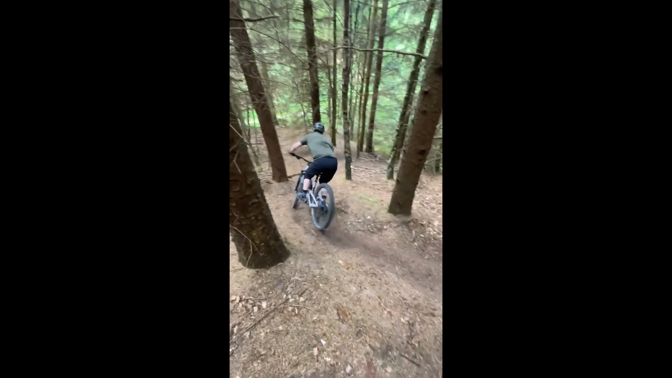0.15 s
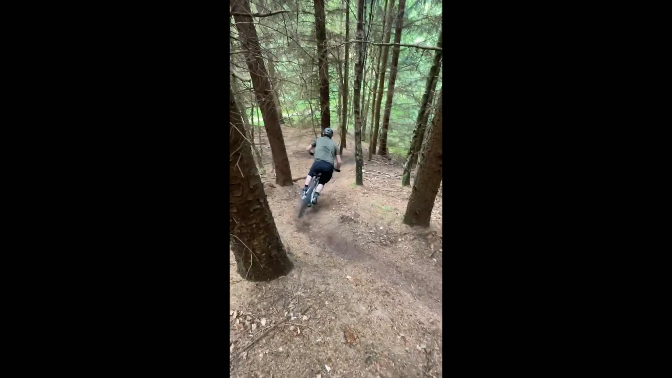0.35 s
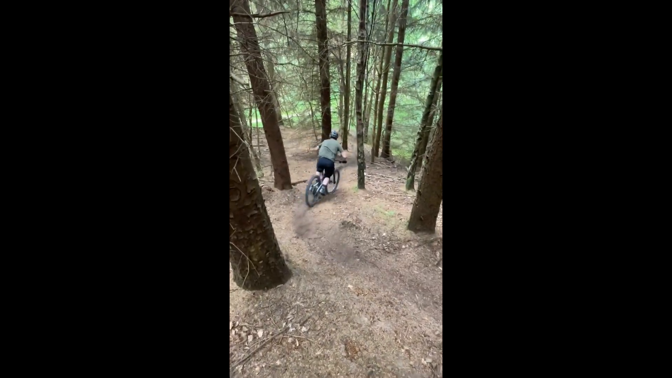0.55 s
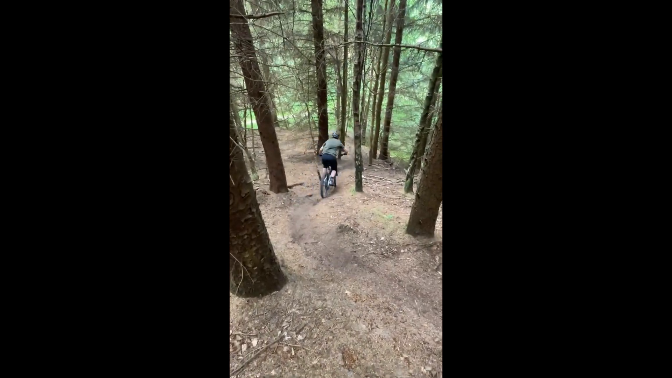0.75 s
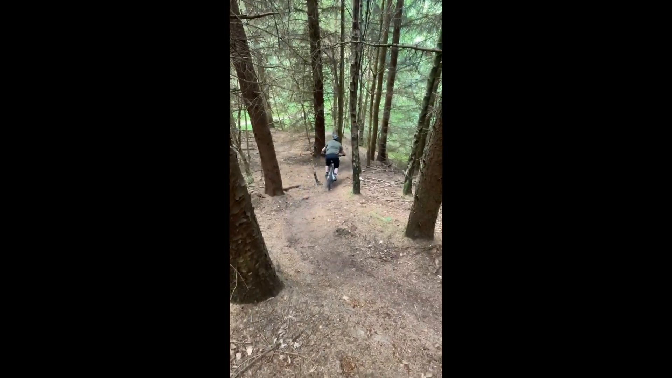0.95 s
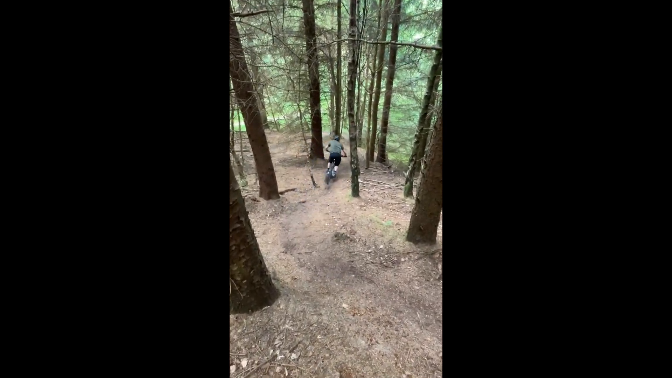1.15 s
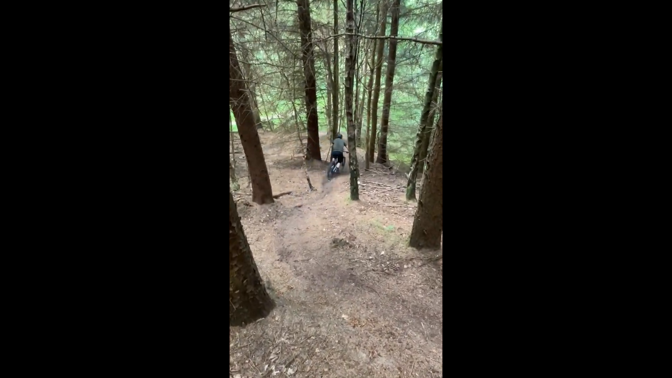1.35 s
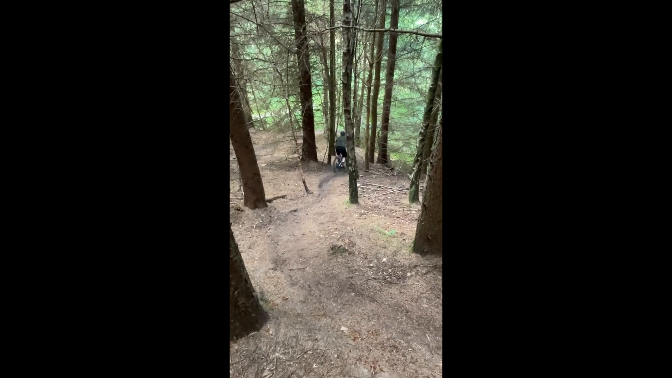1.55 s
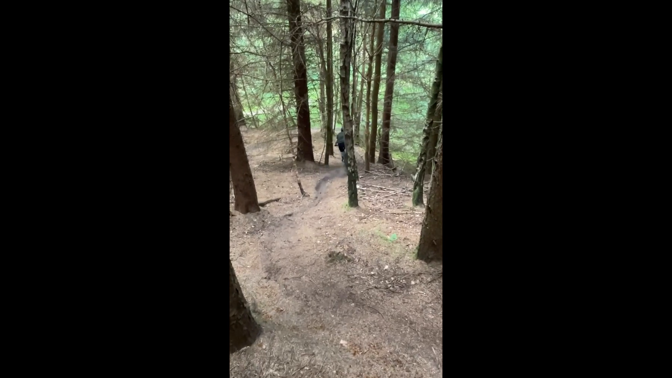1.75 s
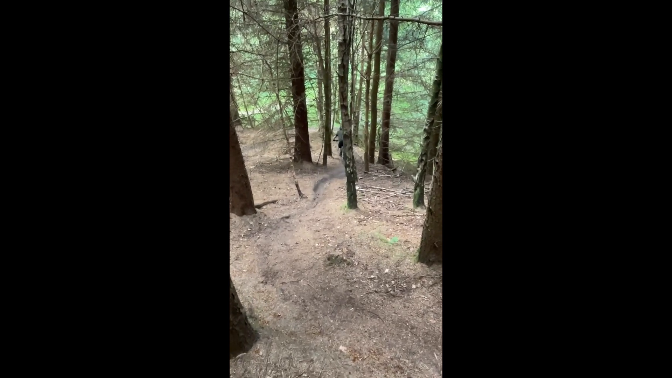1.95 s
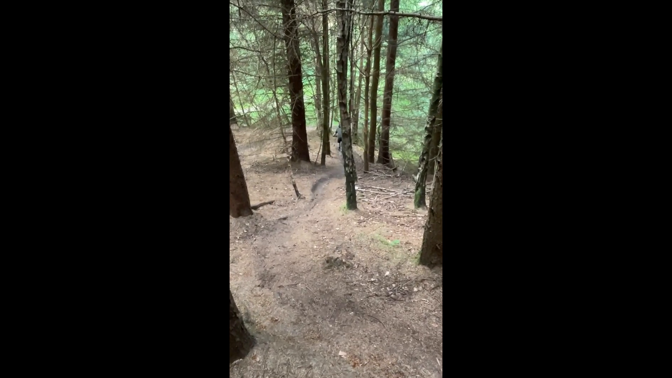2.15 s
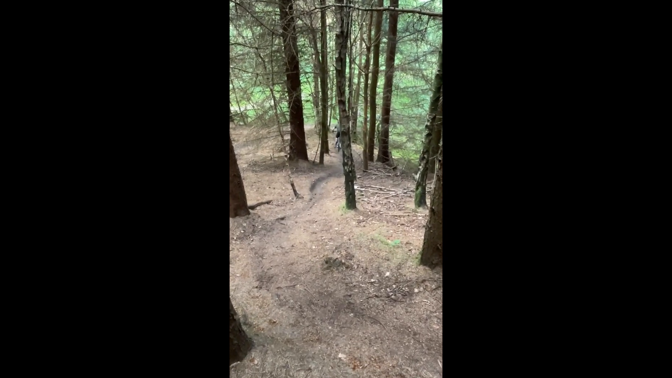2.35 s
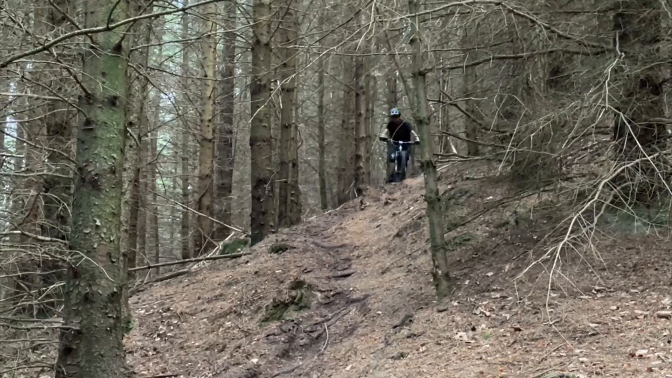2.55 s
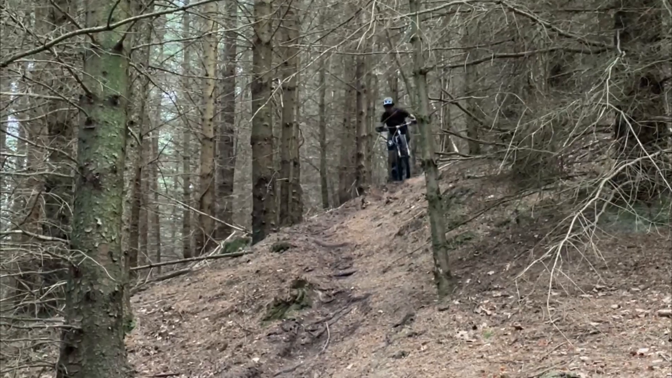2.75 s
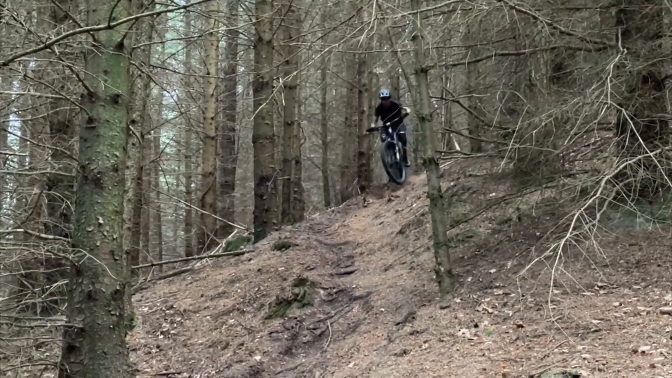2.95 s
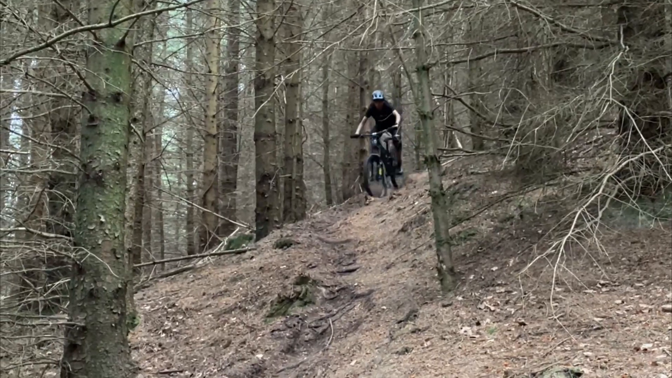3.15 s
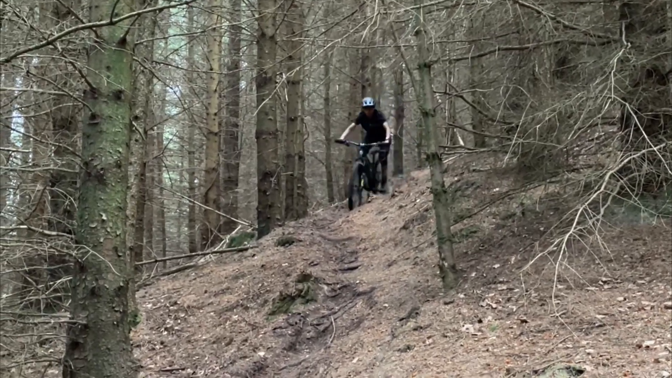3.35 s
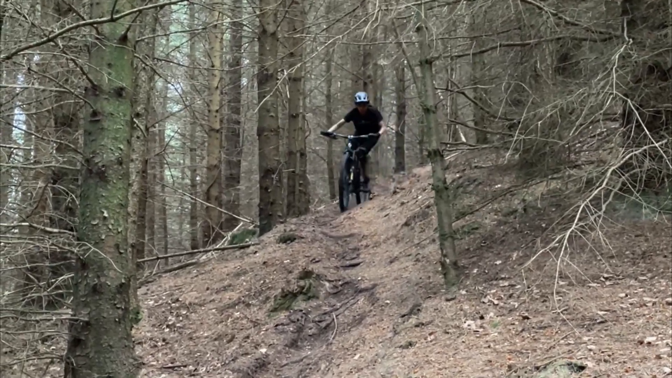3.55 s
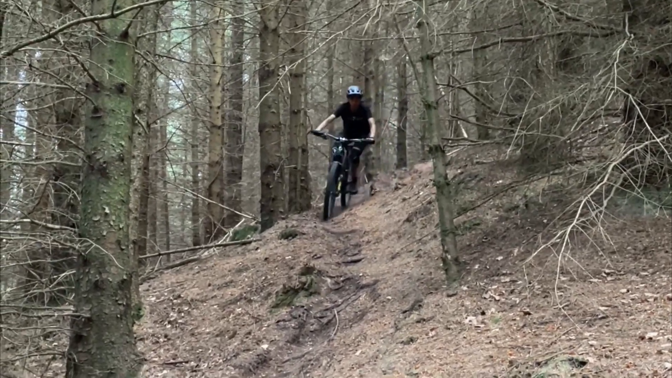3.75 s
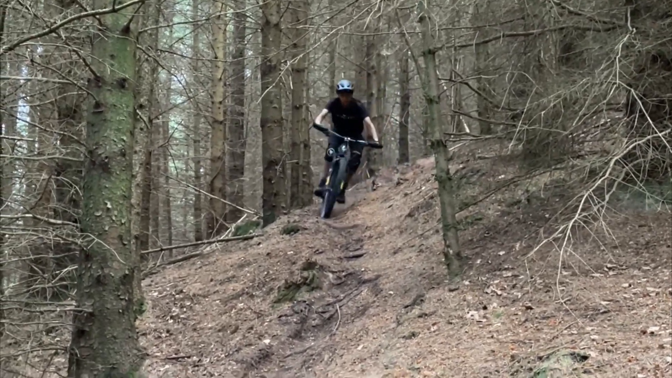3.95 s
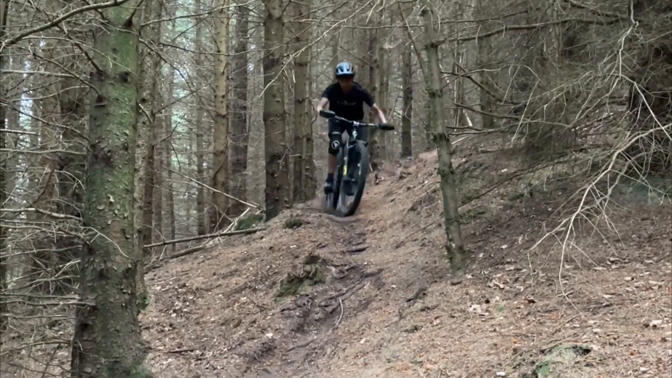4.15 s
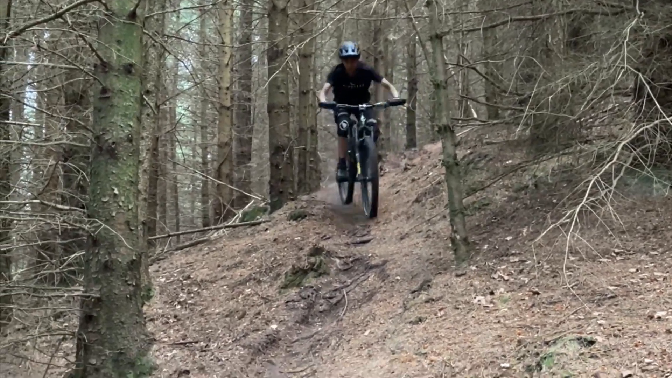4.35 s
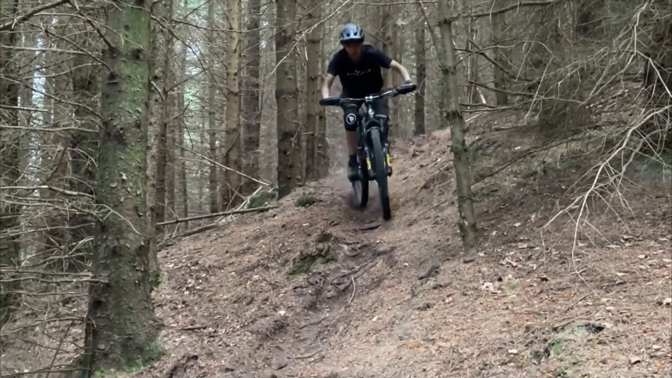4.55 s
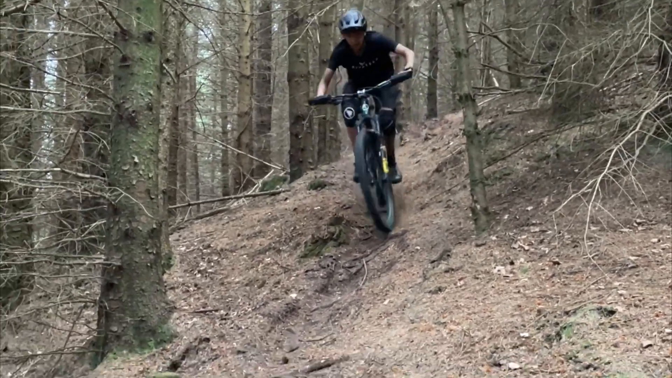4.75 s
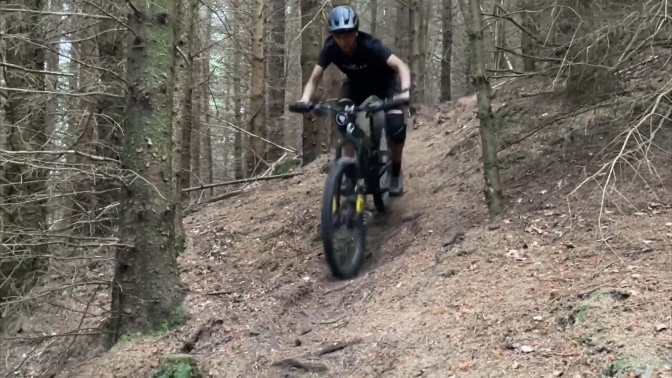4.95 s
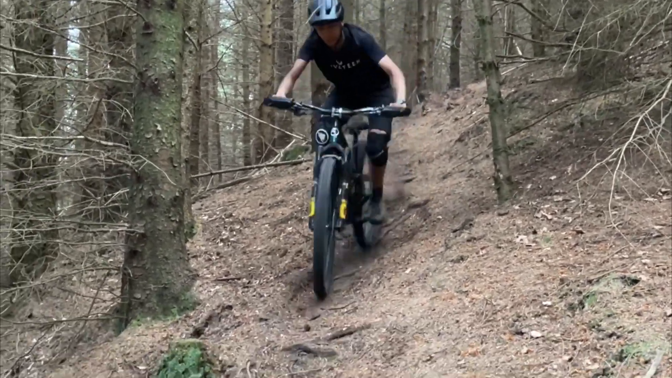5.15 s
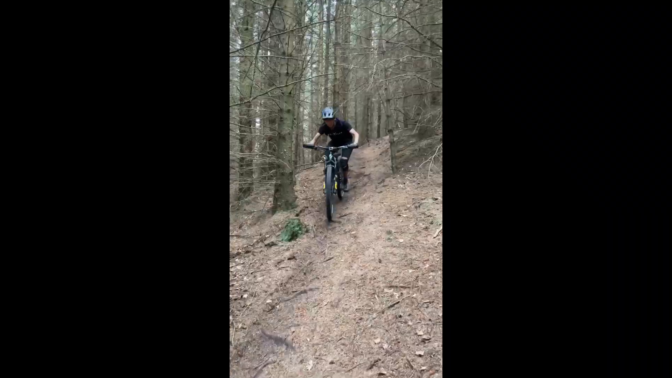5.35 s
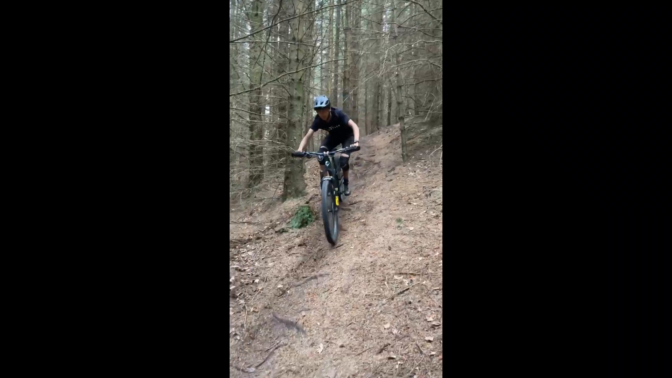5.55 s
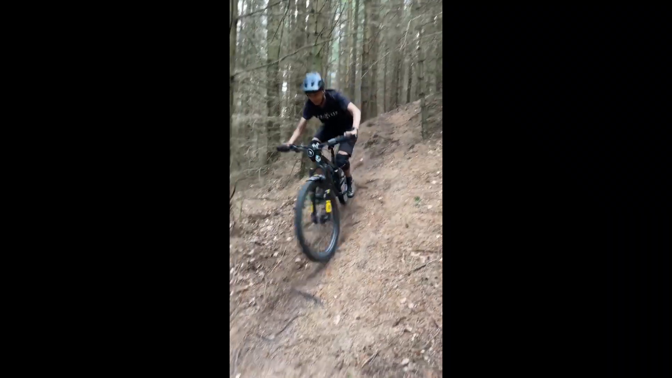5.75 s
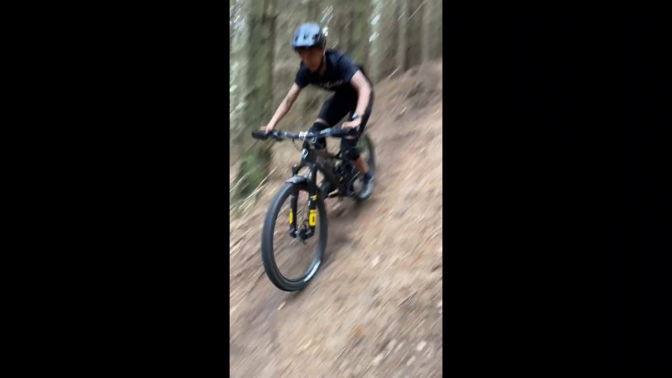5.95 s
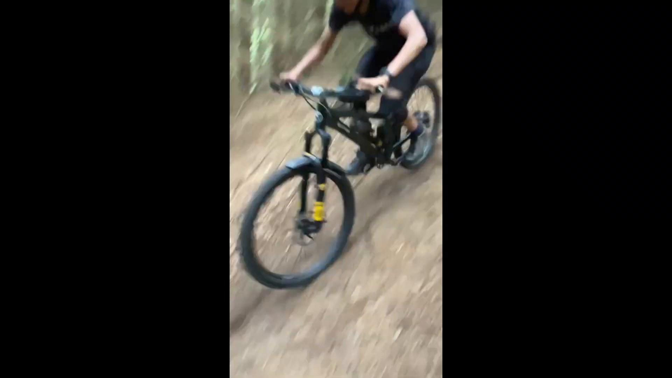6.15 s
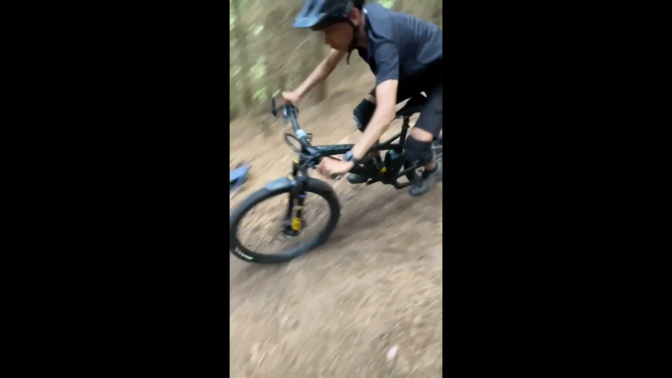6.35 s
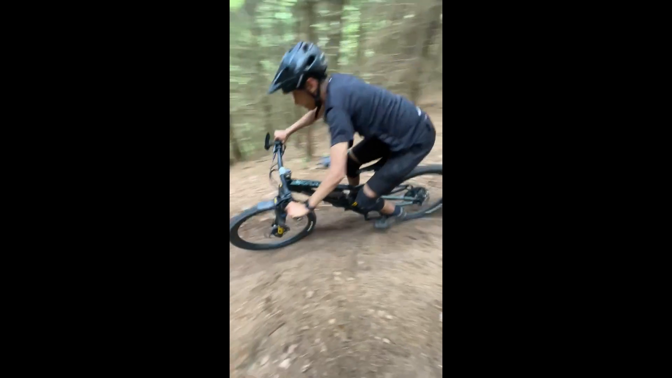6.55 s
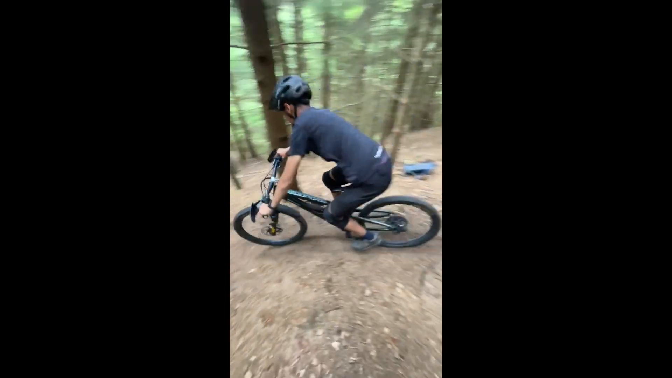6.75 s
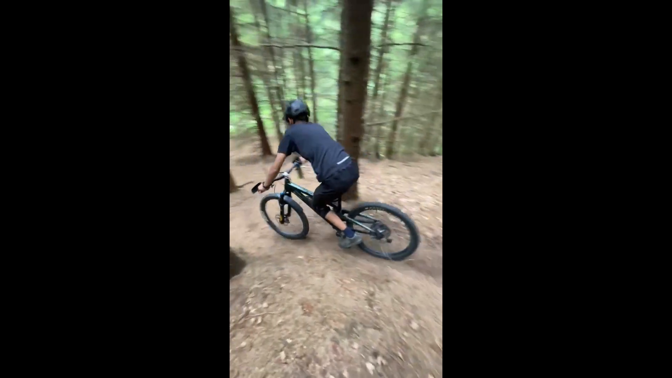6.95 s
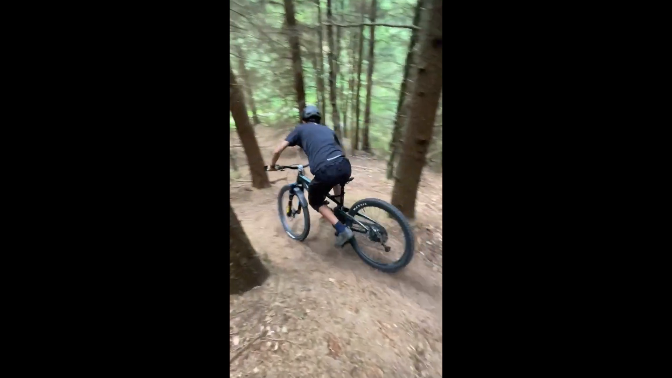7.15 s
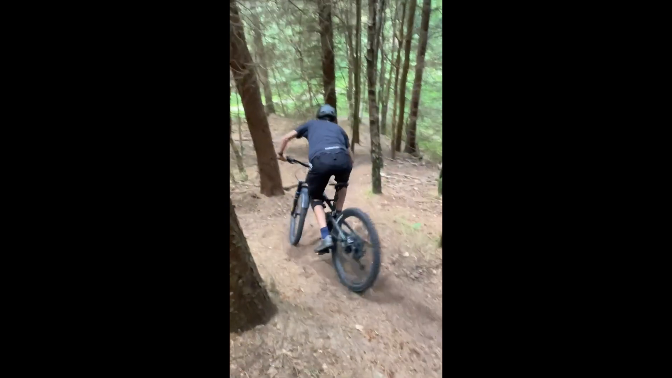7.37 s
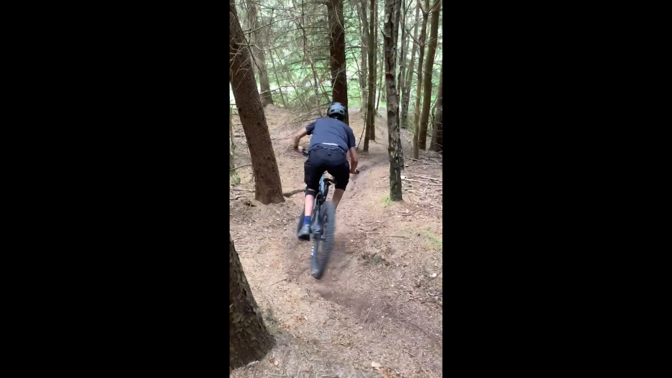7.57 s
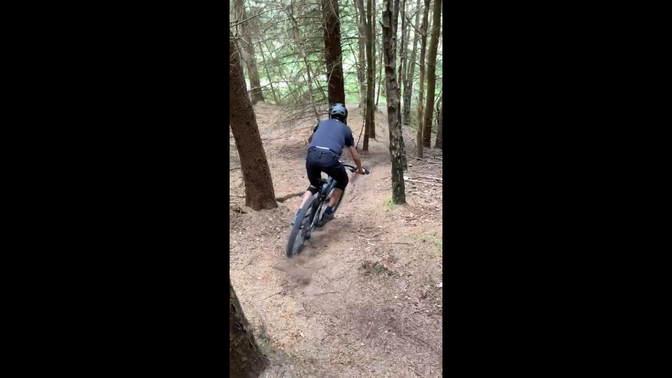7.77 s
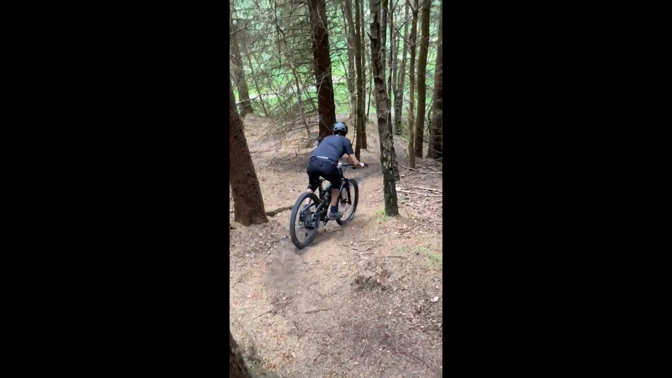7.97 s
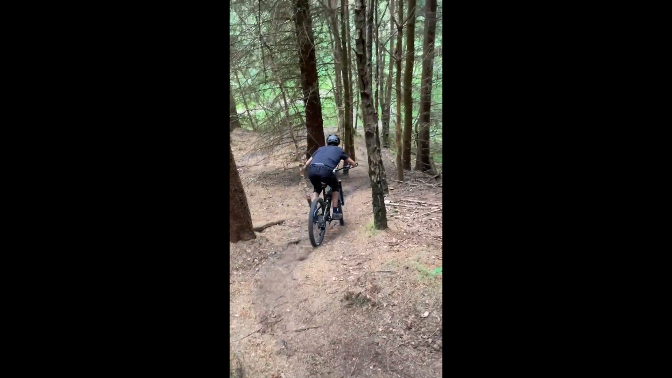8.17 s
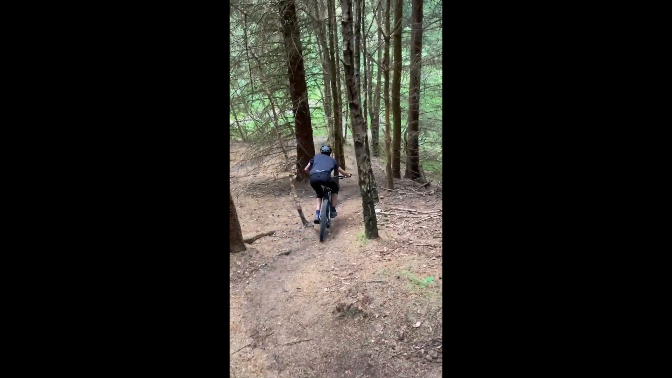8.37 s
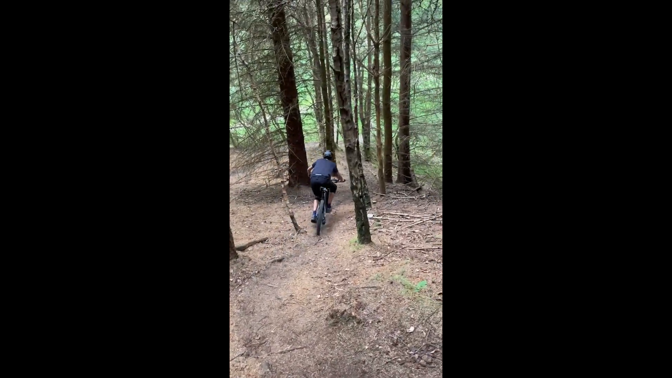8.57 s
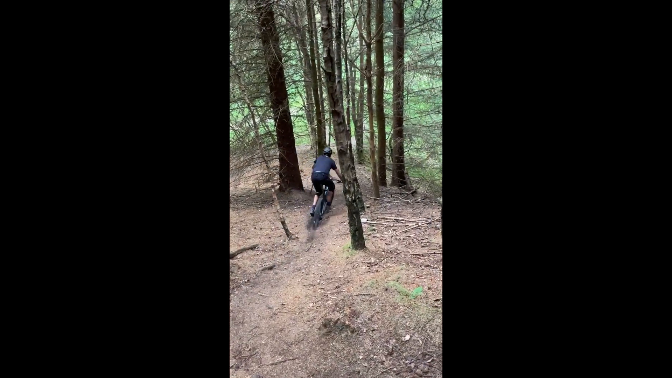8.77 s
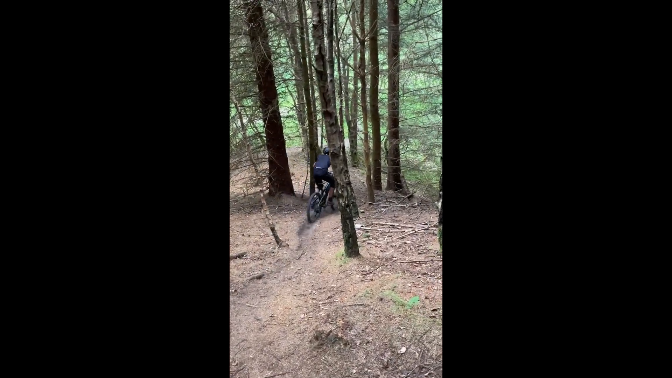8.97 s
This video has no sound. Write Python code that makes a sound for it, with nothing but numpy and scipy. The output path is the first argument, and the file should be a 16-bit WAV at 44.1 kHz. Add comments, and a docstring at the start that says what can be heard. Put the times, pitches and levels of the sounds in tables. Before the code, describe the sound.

Beside a dry forest trail, a bike is already close at 0 seconds: knobbly tyres crunch loose dirt, knock over roots and thump softly, leaning left, with a dull freehub buzz. It recedes through 1 to 2 seconds, leaving sparse crackles, twig ticks, faint bird chatter and a thin high squeak near 2.2. A momentary dip at 2.4 joins a quieter stretch of faint hush, wavering bird whistles and a distant ticking hub. From about 3.9 the second bike's tyres become audible; bumps and crunch grow after 5. It passes very close around 6.2 to 7.1, with hard knocks, low thuds, brittle snaps at 6.4, 6.75 and 7.1, and a bright, fast ratchet. Chain slaps scratch at 7.3, a short brake squeak follows near 7.7, and a snap lands at 7.9. Crunch and buzzing then thin with distance, still rolling at 9 seconds.

```python
"""Mountain bikes on a dry forest trail

One bike freewheels away; after a brief dip in level another comes closer and passes. Knobbly tyres crunch in
filtered random grains and thud over roots as decaying sines, and a pulsed-noise freehub ratchet buzzes.
Twigs snap as ringing ticks, birds whistle in gliding sines and chatter in pulsed hiss, chain and brake join in."""
import sys
import numpy as np
from scipy import signal
from scipy.fft import rfft, irfft
from scipy.io import wavfile
from scipy.ndimage import uniform_filter1d

SR = 44100
rng = np.random.default_rng(int(sys.argv[2]) if len(sys.argv) > 2 else 0)


def transcribe(signal):
    """Save signal, clipped to [-1, 1], as a 16-bit WAV file at the path in sys.argv[1]."""
    frames = np.atleast_2d(signal).T
    limited = np.clip(frames, -1, 1)
    pcm = np.round(limited * 32767).astype(np.int16)
    wavfile.write(sys.argv[1], SR, pcm)


N = 397320
T = np.arange(N) / SR
JOIN_S = 2.402  # the first ride gives way to the second
# Tyre meets root or stone. Each row: time in seconds, blow level before filtering in dB, ring in Hz,
# contact in seconds, drive of the tyre air relative to the blow in dB.
BLOWS = [(0.048, -22, 746, 0.054, -13), (0.088, -23, 1750, 0.055, -25), (0.206, -21, 1000, 0.052, -30),
         (0.249, -22.5, 745, 0.048, -17), (0.331, -26.5, 597, 0.047, -3.5), (0.37, -27, 390, 0.034, -22),
         (0.644, -33.5, 403, 0.027, 4), (0.867, -36, 445, 0.054, -2), (0.909, -35.5, 770, 0.079, -3),
         (1.093, -33, 400, 0.05, -9), (1.124, -31, 1770, 0.17, -20), (1.183, -19.5, 740, 0.029, -2.5),
         (1.235, -28.5, 950, 0.076, -13), (1.439, -38, 890, 0.086, -38), (1.661, -36, 785, 0.082, -0.5),
         (2.296, -34, 740, 0.055, -7), (3.228, -51.5, 2020, 0.14, -26), (3.885, -30, 492, 0.041, -12),
         (3.918, -35.5, 588, 0.1, -26), (4.438, -41, 1360, 0.058, -4.5), (4.528, -38.5, 726, 0.069, -33),
         (4.61, -32, 650, 0.043, -11), (4.764, -33.5, 500, 0.056, -3.5), (4.86, -31, 684, 0.036, -7),
         (4.982, -32.5, 611, 0.026, 0.5), (5.093, -30.5, 690, 0.029, 1), (5.135, -35.5, 617, 0.046, -2),
         (5.181, -30, 812, 0.029, -30), (5.204, -30, 1480, 0.033, -5), (5.31, -42, 2100, 0.044, -32),
         (5.427, -25.5, 556, 0.029, -7), (5.499, -35, 885, 0.037, -0.5), (5.577, -21, 825, 0.035, -2.5),
         (5.819, -15.5, 1050, 0.035, -3), (5.895, -24.5, 634, 0.055, -3), (5.932, -20.5, 718, 0.048, -11),
         (6.081, -14, 560, 0.03, -2), (6.201, -27, 590, 0.028, 4.5), (6.237, -26, 433, 0.068, -7),
         (6.287, -18.5, 1102, 0.04, -20), (6.314, -15, 1620, 0.069, -16), (6.36, -23, 470, 0.025, 3.5),
         (6.398, -33, 1603, 0.03, -38), (6.449, -9, 2420, 0.054, -12), (6.487, -13, 404, 0.051, -6.5),
         (6.742, -13, 660, 0.045, -5.5), (6.899, -24, 461, 0.037, -7), (7.053, -23.5, 417, 0.056, -6),
         (7.1, -24, 1743, 0.074, -6), (7.196, -26, 880, 0.024, -18), (7.37, -23, 531.5, 0.061, -7.5),
         (7.411, -23, 474, 0.036, -16), (7.613, -26.5, 452, 0.024, -34), (7.696, -17, 1210, 0.048, -15.5),
         (7.732, -30.5, 480.4, 0.047, -11), (7.832, -27, 1224, 0.021, -33), (7.927, -21, 622, 0.041, -5),
         (8.04, -29, 1094, 0.037, -5), (8.6, -31, 473, 0.029, -12), (8.78, -34.5, 916, 0.072, -30)]


def undb(db):
    """Amplitude ratio of a level in decibels."""
    return 10 ** (np.asarray(db) / 20)


def unit(x):
    """Normalise to a root mean square of 1."""
    return x / np.sqrt(np.mean(x ** 2))


def track(table):
    """Linear interpolation: the columns of a curve table at every sample."""
    s, *columns = np.transpose(table)
    return [np.interp(T, s, c) for c in columns]


def over_spectrum(points):
    """Amplitude ratio at each FFT bin, from (Hz, dB) points joined along log frequency."""
    hz, db = np.transpose(points)
    f = np.arange(N // 2 + 1) * SR / N + 1
    return undb(np.interp(np.log(f), np.log(hz), db))


def colour(x, points):
    """Spectral shaping: weight each frequency by (Hz, dB) points."""
    return irfft(rfft(x) * over_spectrum(points), N)


def band(x, hz, width):
    """Second-order resonance with a gain of 1 at its peak."""
    return signal.lfilter(*signal.iirpeak(hz, hz / width, fs=SR), x)


def walk(rate):
    """Slow random modulation: levels held for 1 / rate seconds and smoothed twice."""
    k = int(SR / rate)
    steps = np.repeat(rng.standard_normal(N // k + 1), k)
    return uniform_filter1d(uniform_filter1d(steps, k), k)[:N]


def grains(per_s, spread_db):
    """Granular noise: clicks at random times, a few far larger than the rest."""
    hit = rng.random(N) < per_s / SR
    return unit(hit * rng.standard_normal(N) * undb(spread_db * rng.exponential(size=N)))


def bursts(times, gains, lengths, peak_at):
    """Contact force envelopes that build up, peak at a share of their length and let go."""
    env = np.zeros(N)
    for s, g, length in zip(times, gains, lengths):
        i = int((s - .003) * SR)
        u = np.linspace(0, 1, int(SR * length))[:N - i]
        warped = u ** (np.log(.5) / np.log(peak_at))
        env[i:i + len(u)] += g * np.sin(np.pi * warped) ** 2
    return env


def catches():
    """Chain tension hushes the ratchet by this many dB: a gradual onset, then a release within 12 ms."""
    # The swinging rear end pulls the chain tight. Each row: time free again in seconds, length in seconds, hush in dB.
    pulls = [(1.097, 0.049, 10), (4.445, .07, 7), (4.611, 0.059, 5), (4.862, 0.096, 9), (5.108, 0.081, 5),
             (5.578, 0.08, 12), (5.813, .15, 10), (5.953, 0.043, 5), (6.09, .07, 8), (6.962, 0.06, 10),
             (7.11, 0.092, 6), (7.225, 0.076, 6), (7.368, .05, 5), (7.599, 0.048, 8), (7.938, 0.052, 8),
             (8.063, 0.044, 8), (8.796, .06, 9)]
    onset_share, free_s = .85, .012
    hush_db = 0
    for s, length, db in pulls:
        corners = [s - length, s - length * (1 - onset_share), s - free_s, s]
        hush_db = hush_db + np.interp(T, corners, [0, db, db, 0])
    return hush_db


def crunch(roll_db):
    """Granular fracture: clods and needles break under the knobs, and blows ring rim and frame modes."""
    # Dirt spectrum. Each row: frequency in Hz, density in dB.
    dirt_spectrum = [(250, 1), (420, 4), (750, 3.5), (1100, 2), (1900, 0.5), (2600, -5.5), (3300, -12.5),
                     (6000, -38)]
    # Rim and frame modes. Each row: frequency in Hz, width in Hz, mean gain in dB before the mix.
    frame_modes = [(825, 34, -5), (1250, 28, -13), (1860, 64, -20), (2060, 66, -3), (2620, 60, -21)]
    ring_width = .13  # share of the ring pitch
    ring_room = 900  # samples for a ring to die out after the contact
    rolling = undb(roll_db + 2.2 * walk(30) + 2.5 * walk(70)) * grains(3000, spread_db=1.6)
    s, db, hz, contact, _ = np.transpose(BLOWS)
    clods = grains(2600, spread_db=1.6)
    blows = bursts(s, undb(db), contact, peak_at=0.24) * clods

    rings = np.zeros(N)
    for t, f, length in zip(s, hz, contact):
        span = slice(int((t - .003) * SR), int((t + length) * SR))
        blow = np.r_[blows[span], np.zeros(ring_room)]
        rings[span.start:span.stop + ring_room] += band(blow, f, ring_width * f) / (f / 1000) ** 0.63
    # each frame mode is caught by turns as the wheel bucks
    frame = sum(undb(g + 6 * walk(48)) * band(blows + rolling, f, w) for f, w, g in frame_modes)
    # rubber and soil swallow the top of the rings
    lowpass = signal.butter(4, 3300, fs=SR, output="sos")
    body = signal.sosfilt(lowpass, undb(3.5) * rings + undb(-2.5) * frame)

    # bright grit: -60.5 dB for a -30 dB blow at 1 kHz, rising with the blow and 6 dB per octave of ring
    grit_db = -60.5 + 1.1932 * (db + 30) + 6 * np.log2(hz / 1000)
    grit_noise = unit(band(grains(2100, spread_db=2.0), 3300, 3600))
    grit = bursts(s, undb(grit_db), .5 * contact, peak_at=0.12) * grit_noise
    scale = np.std(colour(clods, dirt_spectrum))
    return colour(rolling + undb(-8.0) * blows, dirt_spectrum) / scale + body + grit


def tyre_air(roll_db):
    """Cavity resonance: the air ring inside the tyre hums while rolling and booms just after a blow."""
    # Air ring modes. Each row: frequency in Hz, width in Hz, gain in dB.
    air_modes = [(209.3, 71.4, 16), (243.3, 68, 12.5)]
    s, db, _, contact, air_db = np.transpose(BLOWS)
    booms = bursts(s, undb(db + air_db), contact, peak_at=0.48)
    env = undb(roll_db + 0.15 * walk(18.0)) + undb(-1.5) * booms
    push = env * grains(1200, spread_db=2.0)
    return sum(undb(g) * band(push, hz, w) for hz, w, g in air_modes)


def ground(rumble_db):
    """Damped soil resonance: small jolts rumble, and each landing rings low and sinks in pitch."""
    # Weight lands on the soil. Each row: time in seconds, initial level in dB.
    landings = [(0.198, -25), (0.313, -23), (0.652, -31), (0.872, -41), (1.102, -34), (1.589, -40),
                (1.76, -40), (4.141, -37.5), (4.444, -34), (4.993, -23), (5.232, -28), (5.506, -26),
                (5.843, -23), (6.226, -21), (6.793, -17.5), (7.21, -43), (7.824, -29.5), (8.6, -31)]
    soil_hz, soil_t60_s = 62, 0.13  # pitch at the end of the sinking, time to decay by 60 dB
    jolts = band(band(band(grains(250, spread_db=2.5), 51, 67), 75, 87), 66, 104)
    out = undb(rumble_db + 5.2 * walk(9.8)) * unit(jolts)
    for s, db in landings:
        t = np.maximum(T - s, 0)
        sinking = t + 0.0062 * (1 - np.exp(-t / 0.0071))
        out += undb(db - 60 * t / soil_t60_s) * np.sin(2 * np.pi * soil_hz * sinking)
    return out


def freehub():
    """Periodic impulse excitation: pawls drop over ratchet teeth and each click shakes hub shell and spokes."""
    # Rear wheel. Each row: time in seconds, mean ratchet level in dB and pawl clicks per second
    # while the chain is slack, share of the treble that comes in clicks (0-1).
    wheel = [(0.0, -45.5, 84, 0.2), (1.0, -57, 57, 0.43), (1.18, -47, 69, 0.43), (1.65, -61.5, 72, 0.15),
             (2.38, -65.5, 21, 0.3), (2.42, -71.5, 55, 0.4), (3.2, -60, 84, 0.3), (3.25, -57.5, 108, 0.35),
             (3.9, -59.5, 91, 0.4), (4.5, -55.5, 74, 0.05), (5.0, -50, 96, .38), (6.1, -44.5, 67.5, 0.45),
             (6.23, -36.5, 93, 0.37), (6.3, -44.5, 89, 0.65), (6.62, -36, 64.4, 0.4),
             (6.9, -38.5, 60.2, 0.7), (7.5, -42, 63, 0.59), (8.1, -47, 78, 0.51), (8.45, -50, 105, 0.2),
             (9.0, -50.5, 105, 0.6)]
    # Broad treble. Each row: frequency in Hz, width in Hz before a widening by 1.54, gain in dB.
    treble_bands = [(4760, 9100, 10), (7650, 2120, 7), (9700, 1300, 0), (16100, 3600, 5)]
    # Hub shell of the later bike. Each row: frequency in Hz, width in Hz of the first of two filters (the
    # second # is three times as wide), gain before 5.2 s in dB, gain from 5.2 s on in dB.
    shell_modes = [(1330, 90, 14, 2), (2830, 300, 10, 17), (3200, 260, 11, 5), (5350, 300, 3, 0)]
    switch_s = 5.2
    level_db, rate, share = track(wheel)
    hush_db = catches()
    rate = rate * np.clip(1 - 0.5 * hush_db, .2, 1)  # a tight chain slows the ratchet
    turns = np.cumsum(rate * (1 + 0.06 * walk(8.8))) / SR  # counted in clicks
    size = undb(1.5 * rng.standard_normal(N // 100))[turns.astype(int)]
    click = unit(size * np.exp(-(turns % 1) / rate / .004))  # decay constant 4 ms
    shake = (share * click + 1 - share) * grains(15000, spread_db=1.1)

    broad, rings = 0, 0
    for hz, w, g in treble_bands:
        broad = broad + undb(g) * band(band(shake, hz, 1.54 * w), hz, 1.54 * w)
    for hz, w, early, late in shell_modes:
        gain_db = np.where(T < switch_s, early, late) + 3.4 * walk(14)
        rings = rings + undb(gain_db) * band(band(shake, hz, w), hz, 3 * w)
    # the hush takes half as many dB from the shell rings
    hushed = broad * undb(-hush_db) + (T > JOIN_S) * rings * undb(-hush_db / 2)
    return hushed / np.std(broad) * undb(level_db + 3 * walk(22))


def forest():
    """Stationary coloured noise: the steady forest background, drifting slowly in level."""
    # Background spectrum. Each row: frequency in Hz, density in dB.
    spectrum = [(30, -2), (65, 19), (140, -13), (400, -79), (1200, -18), (3200, 5), (6000, -7.5),
                (15000, -11)]
    return undb(-65 + walk(2.95)) * unit(colour(rng.standard_normal(N), spectrum))


def snaps():
    """Brittle fracture: a sharp tick with a short ring, then splinters crackle out."""
    # Twigs snap, stones tick. Each row: time in seconds, peak in dB before the weight sqrt(Hz / 20000),
    # centre in Hz.
    fractures = [(0.138, -27, 3170), (0.9146, -19, 1920), (1.045, -29, 5900), (1.1172, -20, 2860),
                 (1.14, -19.5, 3130), (1.3185, -23.5, 4660), (1.341, -36, 9000), (1.8548, -33, 3940),
                 (2.877, -37, 1790), (3.2296, -33, 5200), (3.8681, -28, 1830), (4.1123, -24.5, 2620),
                 (4.617, -34, 5500), (4.884, -30, 9970), (4.93, -22, 1910), (4.9332, -22.5, 8850),
                 (5.129, -23, 1925), (5.183, -13, 1200), (5.3127, -13, 2120), (5.6204, -34, 10020),
                 (5.6477, -30, 10000), (5.7687, -19, 2124), (6.0855, -26, 2170), (6.124, -33, 10100),
                 (6.203, -19, 2300), (6.401, -8, 1800), (6.436, -20, 4250), (6.45, -4.5, 2050),
                 (6.7193, -29, 10000), (6.7455, -1.5, 1910), (6.849, -30, 2900), (6.9664, -21.5, 2000),
                 (6.992, -32, 8840), (7.1127, -24, 10000), (7.1352, -1.5, 8100), (7.373, -24, 6020),
                 (7.397, -23, 5500), (7.43, -25.5, 5580), (7.875, -26, 10000), (7.9293, -7, 1570),
                 (8.0628, -25, 9550), (8.599, -36, 1500)]
    length = 1500  # samples
    t = T[:length]
    out = np.zeros(N)
    for s, db, hz in fractures:
        i = int(s * SR)
        chance = rng.standard_normal(length)
        tick = np.sign(chance) * undb(-60 * t / .005)
        splinters = chance * np.abs(chance) * undb(-10 - 60 * t / 0.042)
        tick = tick + splinters
        ring = band(band(tick, hz, 1.15 * hz), hz, hz) + 0.014 * tick  # a little stays unfiltered
        out[i:i + length] += undb(db) * np.sqrt(hz / 20000) * ring / np.max(np.abs(ring))
    return out


def chatter():
    """Amplitude modulation: far birds chatter as a narrow hiss chopped into fast pulses."""
    # Each row: start in seconds, length in seconds, centre in Hz, hiss level in dB before gating and pulsing.
    calls = [(0.55, .32, 4650, -63.5), (0.93, .12, 4600, -68), (1.27, .18, 4620, -64),
             (1.9, .39, 4620, -65)]
    pulses_per_s, width_hz = 75, 500
    pulses = np.sin(np.pi * np.cumsum(pulses_per_s * (1 + .1 * walk(10))) / SR) ** 4
    hiss = rng.standard_normal(N) * undb(4 * walk(25))
    out = 0
    for s, length, hz, db in calls:
        gate = np.interp(T, [s, s + .04, s + length - .04, s + length], [0, 2, 2, 0])
        out = out + undb(db) * gate * unit(band(band(hiss, hz, width_hz), hz, width_hz))
    return pulses * out


def birds():
    """Frequency modulation: thin, wavering whistles far off follow bowed pitch lines."""
    # Each row: start in seconds, length in seconds, first, middle and last pitch in Hz, level in dB,
    # flutter strength (scales the waver in pitch and level).
    whistles = [(1.59, .12, 5200, 4680, 4300, -69, 1), (2.335, .03, 3450, 3350, 3250, -66, .5),
                (2.455, .045, 3350, 3480, 4150, -62, 1), (2.89, .065, 4550, 4450, 4380, -69, 2),
                (2.965, .2, 5050, 3830, 4500, -66, .8), (3.16, .06, 4450, 4550, 4600, -72, 1),
                (4.43, .17, 4180, 4180, 4180, -68.5, .7), (4.65, .08, 4180, 4180, 4180, -66.5, .7),
                (4.76, .045, 4200, 4200, 4200, -67, .7), (4.17, .06, 3150, 3450, 3850, -63, 2)]
    edge_s = .012
    out = 0
    for s, length, first, middle, last, db, flutter in whistles:
        u = np.clip((T - s) / length, 0, 1)
        hz = np.polyval(np.polyfit([0, .5, 1], [first, middle, last], 2), u)
        waver = 1 + .006 * flutter * walk(120)
        tone = np.sqrt(2) * np.sin(2 * np.pi * np.cumsum(hz * waver) / SR)
        sings = np.clip(np.minimum(u, 1 - u) * length / edge_s, 0, 1)
        out = out + sings * undb(db + 2 * flutter * walk(80)) * tone
    return out


def squeaks():
    """Friction squeal: a thin tone, unsteady in pitch and level."""
    # A brake pad grazes the disc. Each row: start in seconds, length in seconds, peak in dB before
    # the roughness, mean pitch in Hz.
    grazes = [(2.235, .16, -56, 13300), (7.659, 0.034, -40, 1880), (7.683, 0.026, -35, 1850),
              (7.715, 0.09, -44, 1950)]
    waver_hz, rough = 170 * walk(150), undb(7 * walk(400))
    out = 0
    for s, length, db, hz in grazes:
        tone = np.sin(2 * np.pi * np.cumsum(hz + waver_hz) / SR)
        out = out + bursts([s], [undb(db)], [length], peak_at=0.37) * tone
    return rough * out


def chain():
    """Impact excitation: the chain slaps the stay in short scratchy bursts that ring the links."""
    # Each row: time in seconds, peak of the slap envelope before the link filters in dB.
    slaps = [(7.229, -35), (7.269, -38), (7.287, -33.5), (7.304, -32.5), (7.309, -33)]
    # Link modes. Each row: frequency in Hz, width in Hz, relative gain in dB.
    link_modes = [(3220, 180, 0), (4000, 450, -20), (2270, 440, -4)]
    s, db = np.transpose(slaps)
    slap = bursts(s, undb(db), np.full(len(s), .01), peak_at=0.36) * rng.standard_normal(N)
    # a narrow mode passes less noise power, so its gain is raised
    return sum(undb(g) * np.sqrt(SR / 2 / w) * band(slap, hz, w) for hz, w, g in link_modes) / 2


def scatter_tails(dirt, song):
    """Multiple scattering: trunks add a decaying noise tail, stronger for the far birds."""
    t = T[:9000]
    tail = band(rng.standard_normal(9000), 2000, 11600) * undb(-60 * t / 0.28)
    dirt = dirt + undb(-40) * signal.fftconvolve(dirt, tail)[:N]
    echo = rng.standard_normal(SR // 2) * undb(-32.5 - 60 * T[:SR // 2] / .55)
    return dirt, song + signal.fftconvolve(song, echo)[:N]


def ports(x, alike=0.55):
    """Two-port interference: the side is partly the mid a quarter cycle off in phase, partly scattered."""
    # Two microphone ports a few centimetres apart cancel by turns in sum and difference.
    # Each row: frequency in Hz, side minus mid in dB.
    side_over_mid = [(60, -52), (200, -25.5), (450, -11), (1000, -9), (1700, -19), (2700, 0.5), (4300, -7),
                     (5200, -9), (6400, -0.5), (7600, 27), (8700, 2), (11100, -10.5), (12400, -3),
                     (14300, 19.5), (15800, 12.5)]
    ratio = over_spectrum(side_over_mid)
    scatter = rfft(rng.standard_normal(1300) * undb(-60 * T[:1300] / .03), N)
    mid = rfft(x) / np.sqrt(1 + ratio ** 2)
    side = mid * ratio * (1j * alike + np.sqrt(1 - alike ** 2) * scatter / np.abs(scatter))
    return np.array([irfft(mid + side, N), irfft(mid - side, N)])


def scene():
    """Superposition: all sources add, with the crunch panned by a level difference."""
    # Rolling tyres swell and fade with distance. Each row: time in seconds, then the drive levels
    # before filtering of crunch, ground rumble and tyre air in dB.
    roll = [(0.0, -41.5, -40, -46), (0.22, -39, -38, -29), (0.56, -49.5, -43.5, -45),
            (0.9, -54.5, -47.5, -51), (1.13, -52.5, -48, -52), (1.4, -50.5, -52.5, -48),
            (2.38, -58, -58.5, -57), (2.584, -70, -59, -71.5), (2.9, -68.5, -101, -99),
            (3.3, -67, -55, -67.5), (3.87, -63, -55.5, -63.5), (3.9, -56, -52.5, -47),
            (4.52, -62, -57.5, -77), (5.08, -47, -41, -46.5), (5.48, -54.5, -44.5, -48.5),
            (5.87, -48, -41.5, -41), (6.38, -45.5, -36.5, -36), (6.62, -54, -46, -37),
            (6.96, -40.5, -37, -40), (7.35, -48.5, -43.5, -44.5), (7.85, -46, -39.5, -45),
            (8.4, -61.5, -51, -54.5), (9.0, -49, -46, -47)]
    # Each row: time in seconds, gain of left minus right in dB.
    crunch_pan = [(0, 8), (2.38, 6), (2.42, 5), (6, 1), (9, -0.5)]
    crunch_db, rumble_db, air_db = track(roll)
    pan_db, = track(crunch_pan)
    # the tyres lighten with 0.45 of the ratchet's hush
    dirt = crunch(crunch_db - 0.45 * catches())
    bike = tyre_air(air_db) + ground(rumble_db) + freehub() + snaps() + squeaks() + chain()
    dirt, song = scatter_tails(dirt, chatter() + birds())
    pan = undb(np.array([pan_db, -pan_db]) / 2)
    return ports(bike + song + forest()) + ports(dirt) * pan


def record(dry):
    """Saturation and band limiting: a short dip joins the rides, peaks round off, bass and top are cut."""
    fade = np.clip(np.abs(T - JOIN_S) / .015, .05, 1)
    bass_cut = signal.butter(3, 38, "high", fs=SR, output="sos")
    top_cut = signal.ellip(8, .2, 80, 16000, fs=SR, output="sos")
    out = signal.sosfilt(bass_cut, dry * fade)
    return signal.sosfilt(top_cut, .9 * np.tanh(out / .9))


dry = scene()
out = record(dry)
transcribe(out)
```